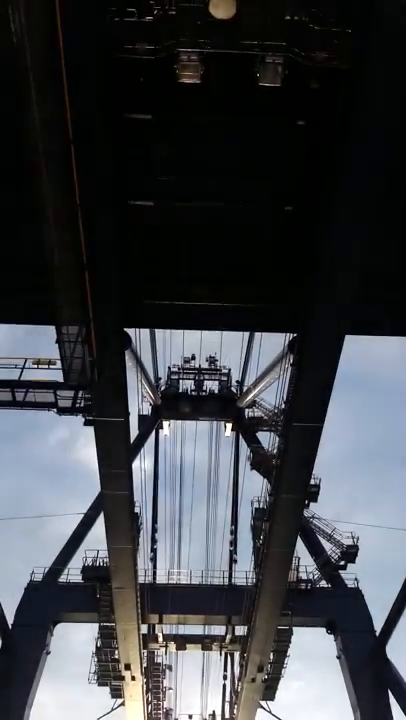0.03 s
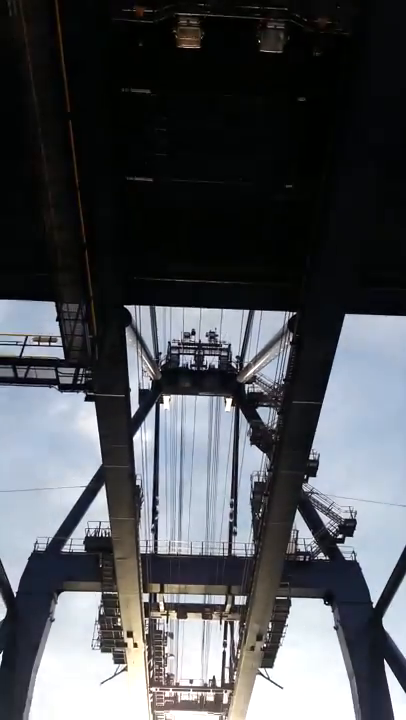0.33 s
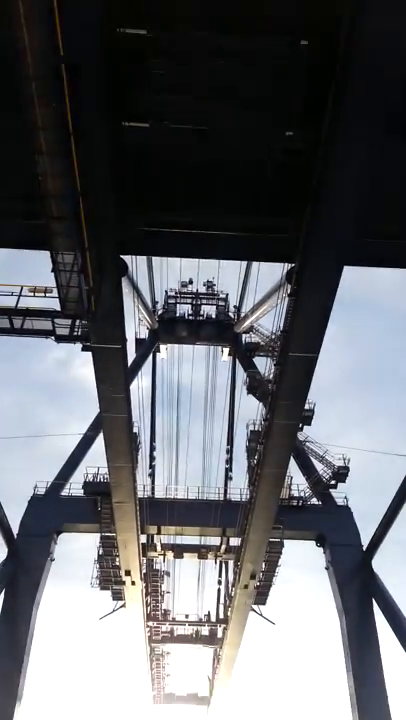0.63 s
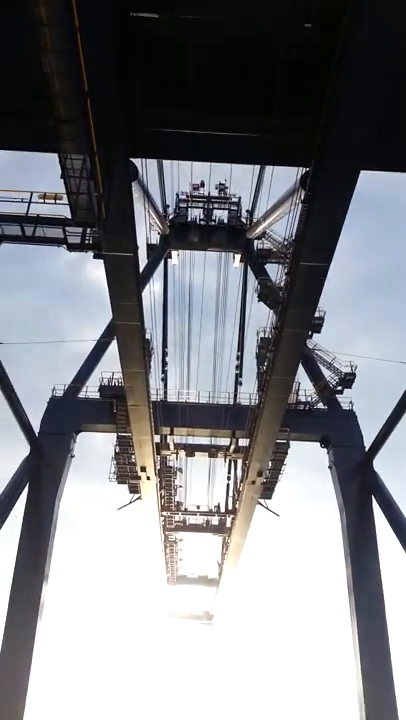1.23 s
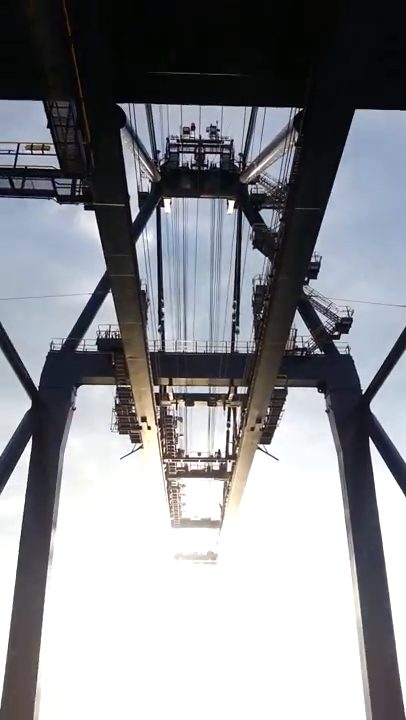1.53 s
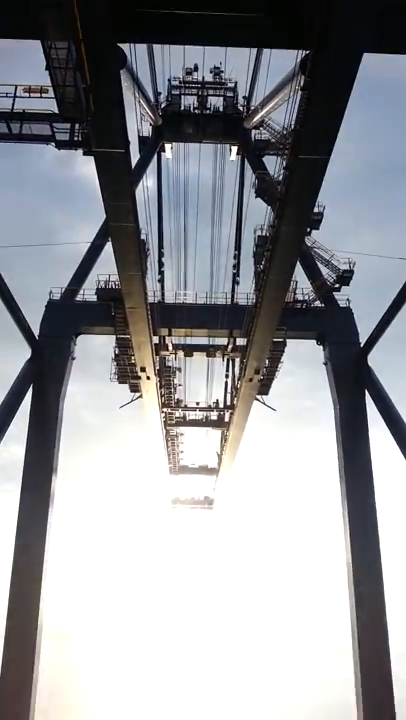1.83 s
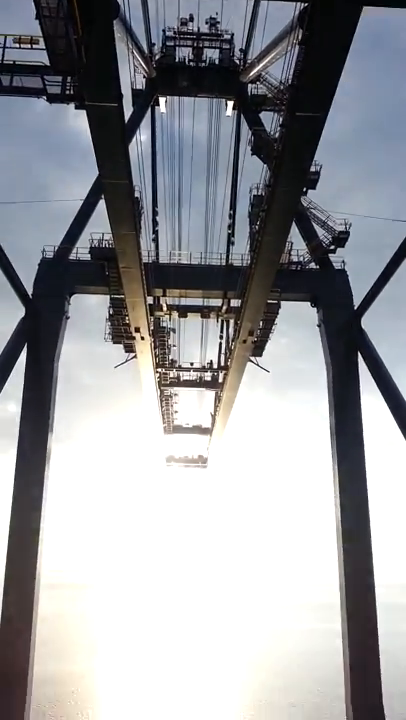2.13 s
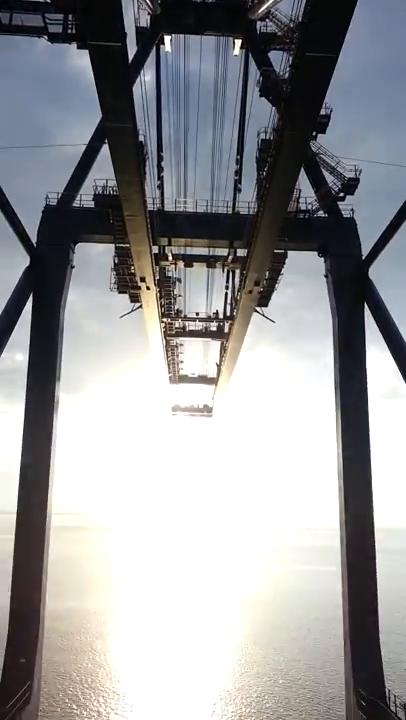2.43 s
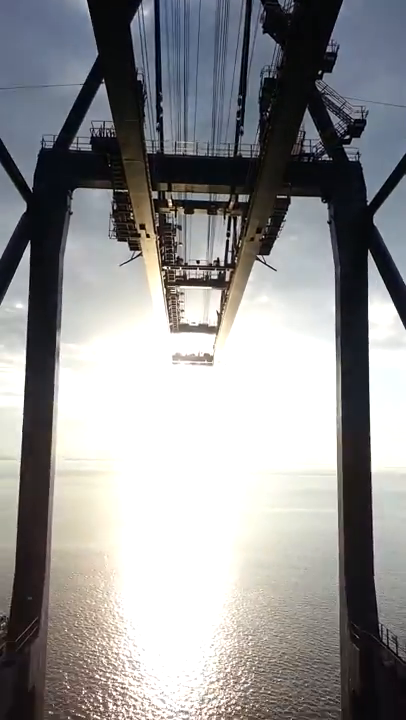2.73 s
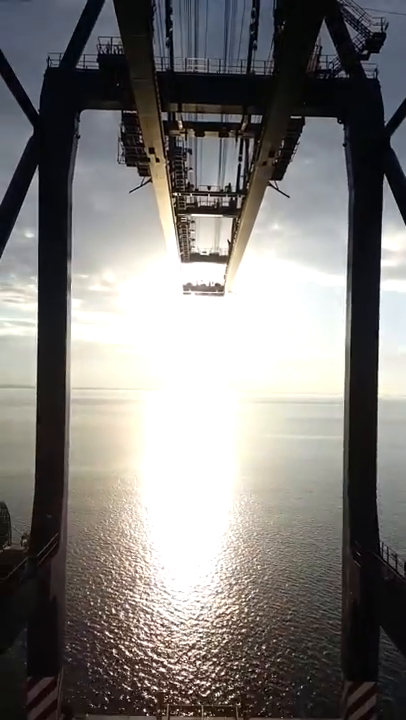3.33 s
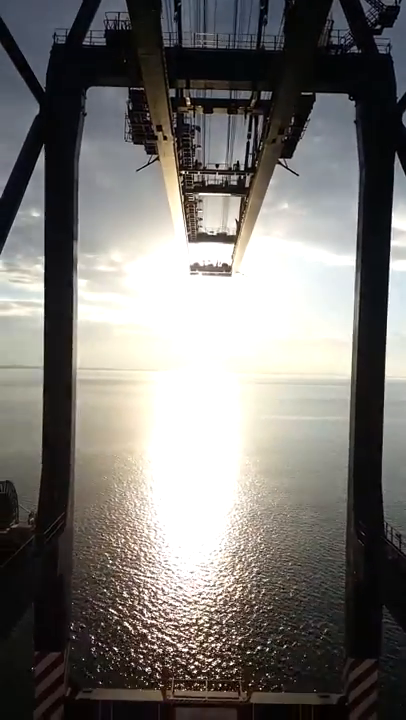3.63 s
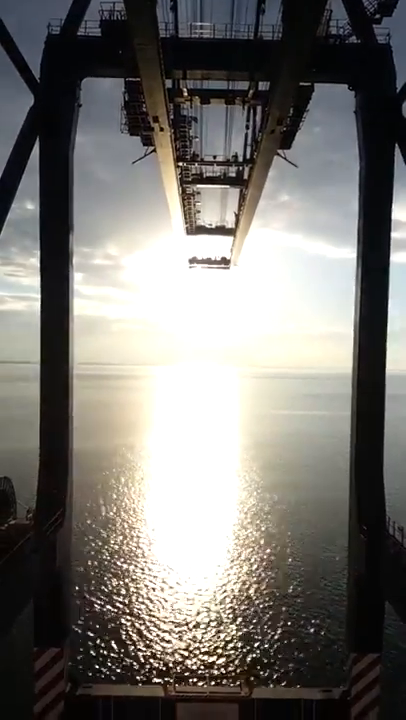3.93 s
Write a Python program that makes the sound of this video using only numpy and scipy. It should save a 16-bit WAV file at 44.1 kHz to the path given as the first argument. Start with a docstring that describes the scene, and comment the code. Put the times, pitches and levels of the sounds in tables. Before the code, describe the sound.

Heard from on board, a harbour crane trolley rumbles along with a hum, a high fluttering whine and quick rattling knocks. Late on it crosses a rail joint with a loud, lingering metallic boom and a smaller clank.

```python
"""The trolley of a container crane, heard on board as it rolls high above a harbour.
Its motor hums in harmonics of one fundamental, and the close tones of its inverter beat as they whine.
The wheels rumble and, for the first two seconds or so, clatter about eight times a second.
Late on they cross a rail joint: the impacts excite the modes of the steel girder,
which boom and slowly die away, and a lighter clank follows."""
import sys
import numpy as np
from scipy import signal
from scipy.io import wavfile

SR = 44100
rng = np.random.default_rng(int(sys.argv[2]) if len(sys.argv) > 2 else 0)


def to_wav(sig):
    """Store sig (one row per channel, or 1-D mono) as 16-bit WAV at the path in sys.argv[1].

    Samples outside -1..1 are clipped; the rate is SR.
    """
    pcm = np.clip(np.atleast_2d(sig), -1, 1) * 32767
    pcm = np.round(pcm).astype(np.int16)
    wavfile.write(sys.argv[1], SR, pcm.T)  # frames by channels


N = 176400

# Balance is left level minus right; lead is the phase by which the left ear is ahead.
# motor harmonics: order, relative level/dB, balance/dB, growth/(dB/s), lead/rad
MOTOR_HARMONICS = [(3, -45.5, -2, -1.0, 0.6), (5, -39.0, 0, 1.0, 2.8), (6, -44.0, 6, 2.5, -0.8),
                   (7, -52.0, 0, -0.5, -1.2), (9, -45.5, -4, -2.5, 1.1), (10, -52.0, -6, -2.5, -1.5),
                   (12, -55.5, 2, 1.0, 1.2), (13, -45.0, 3, 1.5, -0.5), (15, -52.5, 1, 2.0, 2.1),
                   (17, -50.0, 1, -3.0, 2.0), (21, -55.0, 6, -2.5, -1.2)]
# gear and drive tones: f/Hz, relative level/dB, balance/dB, growth/(dB/s), lead/rad
GEAR_TONES = [(1229, -45.0, 4, 2.5, 3.0), (1280, -42.5, 3, 0.0, 2.9), (1536, -53.0, 4, 2.5, 2.9),
              (1791, -48.0, 2, 1.0, 1.5), (1842, -45.0, -2, 0.5, 1.7), (2047, -52.5, -4, 1.0, -0.2),
              (2456, -50.5, 0, 0.5, 0.3), (3685, -55.5, 1, 1.0, -2.7), (4095, -54.0, -1, -1.5, -3.1),
              (4300, -52.0, -2, -2.0, 2.7), (4351, -54.5, -2, 0.5, 1.8), (4862, -59.0, 3, -1.5, -3.1),
              (5156, -60.5, -2, 0.5, 1.8)]
# course of the low hum: t/s, relative level/dB
HUM_LEVEL = [(0, 1), (.5, 1.5), (1.0, -1), (1.4, -7), (2.0, 0.5), (2.7, -6.5), (4.0, -5)]
# the inverter's two whines: t/s, relative level/dB, balance/dB
LOWER_WHINE = [(0, -37.5, 3), (0.1, -36.0, -12), (0.22, -30.0, 2), (0.33, -36.0, 5), (0.48, -32.5, -5),
               (0.6, -31.5, -8), (0.7, -28.0, -3), (0.86, -28.5, -1), (0.97, -31.5, 3), (1.12, -30.0, 1),
               (1.25, -29.5, -2), (1.38, -32.5, -14), (1.55, -32.0, 3), (1.88, -35.5, -14),
               (2.1, -32.0, -7), (2.3, -32.0, 0), (2.48, -35.0, -5), (2.66, -44.0, 1), (2.87, -35.5, 1),
               (3.15, -40.5, -14), (3.52, -31.5, -1), (3.8, -36.0, 3), (3.95, -36.0, 3)]
UPPER_WHINE = [(0, -44.0, 11), (0.2, -45.0, 1), (0.33, -37.0, -1), (0.48, -39.0, -1), (0.66, -34.0, -1),
               (0.85, -37.0, -12), (1.05, -41.5, -10), (1.2, -42.0, 10), (1.4, -40.5, 6), (1.8, -45.0, -2)]
# their direction, turning as the trolley moves: t/s, lead/rad
WHINE_LEAD = [(0, .3), (.35, -.6), (.6, .8), (.87, 1.0), (1.05, 2.5), (1.37, 2.4), (1.55, 1.2), (1.8, 1.6),
              (2.05, -1.4), (4, -1.1)]
# inverter side tones and overtones: f/Hz, level/dB, balance/dB, growth/(dB/s), lead/rad
INVERTER_TONES = [(3046, -51.5, 3, -6.0, 1.2), (3055, -49.5, 0, 1.5, -2.6), (3108, -48.5, -1, -2.0, 3.0),
                  (3138, -50.5, -4, 1.0, 2.0), (6117, -66.0, 3, -6.0, 2.2), (6141, -58.5, 0, 2.0, -1.2),
                  (6157, -59.5, 0, 2.5, -0.8), (9192, -67.0, 2, -2.0, 2.2), (9231, -62.5, -1, 0.0, -1.4)]
# course of the wheel rumble: t/s, level/dB
RUMBLE_LEVEL = [(0, -32.5), (.6, -32), (1.1, -31), (1.5, -33.5), (2.2, -35), (2.7, -36.5), (2.98, -37),
                (3.06, -33)]
# spectra of wheel rumble and of air and rail hiss: f/Hz, relative density/dB
RUMBLE_SPECTRUM = [(25, -28), (50, -37), (80, -12.5), (125, -5), (190, -0.5), (250, -1.5), (310, -2.5),
                   (400, -5.5), (520, -2), (800, -4.5), (1250, -4), (1700, -24.5), (3000, -32)]
HISS_SPECTRUM = [(500, -32), (1200, -7), (1700, 5.5), (2200, 1), (2650, 7.5), (3100, 8), (3900, 4.5),
                 (5200, -1.5), (6100, -8.5), (7900, -15), (9000, -32.5), (10200, -16), (12000, -51)]
# likeness of the two ears' signals, for rolling and for the girder: f/Hz, correlation before clipping
ROLL_LIKENESS = [(60, 0.35), (130, 0.95), (280, 0.89), (610, 0.65), (1320, 0.3), (2860, -0.67),
                 (6190, 0.27), (13400, -1.1)]
GIRDER_LIKENESS = [(60, 0.73), (150, 0.99), (360, 0.92), (900, 0.52), (2210, 0.64), (5440, -0.24),
                   (13400, 0.98)]
# side from which each noise band arrives: f/Hz, balance/dB
BAND_BALANCE = [(200, -1), (700, -1), (1000, 0), (1350, 7), (1750, 0), (2200, -0.5), (3300, 0),
                (4300, -3.5), (6000, 4), (9000, 1)]
# wheel knocks: t/s, clatter level/dB, rattle level/dB, ring level/dB
KNOCKS = [(0.004, -30.5, -30, -41), (0.124, -28, -32, -37), (0.247, -31, -30, -46),
          (0.366, -32.5, -30.5, -40), (0.489, -29, -31, -40), (0.62, -28, -33, -36), (0.734, -40, -38, -38),
          (0.854, -28, -34, -36), (0.936, -30, -48, -51), (0.965, -45, -46, -41), (1.048, -33.5, -36, -32),
          (1.163, -37, -41, -32.5), (1.285, -33.5, -37.5, -31.5), (1.413, -32, -38, -36),
          (1.534, -31.5, -41.5, -36), (1.665, -28.5, -33.5, -33), (1.798, -31, -41, -36),
          (1.947, -34, -47, -38), (2.08, -33.5, -50, -45), (2.203, -38.5, -42, -56),
          (2.333, -30.5, -39, -47)]
# spectra of a knock's two noises: f/Hz, relative density/dB
CLATTER_SPECTRUM = [(60, -38), (160, -9.5), (300, -9), (600, -6), (800, -3), (1030, 2.5), (1350, 2),
                    (1700, -21), (2600, -9.5), (3500, -18), (6000, -35)]
RATTLE_SPECTRUM = [(1200, -22), (2100, 10.5), (3000, 10.5), (4000, 6), (5300, -1), (6200, -46), (9000, -23)]
# spectra of the sounds at the rail joint: f/Hz, relative density/dB
BOOM_SPECTRUM = [(25, -48), (50, -46.5), (80, -23), (120, -13), (170, 1), (300, -1.5), (480, -3.5),
                 (680, -11), (1150, -9), (1900, -22), (2800, -20), (3800, -26.5), (5300, -21.5),
                 (6100, -30.5), (8200, -35.5), (9500, -55)]
CONTACT_SPECTRUM = [(300, -5), (600, -4), (850, 27), (1100, -11), (1700, -18), (5000, -28)]
CRASH_SPECTRUM = [(300, 4), (700, 12), (1300, 15), (2000, -3), (3000, -15), (4300, 1), (5200, 3),
                  (6200, -15), (8200, -20), (9300, -42)]
SWELL_SPECTRUM = [(70, -37), (150, -10), (240, 0), (320, 8), (400, 0), (500, -7), (750, -12), (2000, -48)]
CLANK_SPECTRUM = [(150, -28.5), (600, -2), (1000, -5), (1350, 12), (1900, -11.5), (2800, -6), (4500, -11),
                  (6200, -29), (9000, -56)]
# time the girder takes to decay by 60 dB: f/Hz, T60/s
GIRDER_T60 = [(60, 14), (150, 2.7), (300, 3.6), (600, 3.26), (1200, 3.17), (3000, 4.7), (8000, 2.9)]

MOTOR_HZ, LOWER_WHINE_HZ, UPPER_WHINE_HZ = 224.2, 3070, 3093.5
RING_HZ, RING_WIDTH_HZ = 3065, 200
FIRST_BLOW_S, SECOND_BLOW_S = 3.055, 3.112


def from_db(db):
    """Amplitude ratio: tenfold for every 20 dB."""
    return 10 ** (np.asarray(db) / 20)


def unit_rms(x):
    """Normalisation to unit mean power."""
    return x / np.sqrt(np.mean(x ** 2) + 1e-20)


def clock():
    """Uniform sampling: the time of each sample in seconds."""
    return np.arange(N) / SR


def in_time(rows):
    """Linear interpolation of (t/s, value) rows at every sample."""
    return np.interp(clock(), *np.transpose(rows))


def at_hz(rows, hz):
    """Interpolation of (f/Hz, value) rows on a logarithmic frequency axis."""
    frequencies, values = np.transpose(rows)
    return np.interp(np.log(hz), np.log(frequencies), values)


def pan(balance_db):
    """Level difference between the ears at constant total power."""
    gains = from_db(np.array([[1], [-1]]) * balance_db / 2)
    return gains / np.sqrt(np.mean(gains ** 2, axis=0))


def drift(rate_hz):
    """Slow random fluctuation: low-pass filtered noise of unit rms."""
    step, settling = 100, 1000
    pole = np.exp(-2 * np.pi * rate_hz * step / SR)
    white = rng.standard_normal(N // step + settling + 2)
    slow = signal.lfilter([1], [1, -2 * pole, pole ** 2], white)[settling:]
    return np.interp(np.arange(N) / step, np.arange(len(slow)), unit_rms(slow))


def tone(hz, lead, wander_hz, waver_db, scatter=0.42):
    """Interference: a wandering sine adds to reflections that shift differently at each ear."""
    phase = 2 * np.pi * np.cumsum(hz + wander_hz * drift(7.9)) / SR
    ears = []
    for angle in (phase, phase - lead):
        waver = from_db(waver_db * drift(2.8))
        reflections = drift(5.5) / 2 * np.sin(angle) + drift(1.53) * np.cos(angle)
        ears.append(waver * (np.sin(angle) + scatter * reflections))
    return np.sqrt(2) * np.array(ears)


def partials(rows, wander_hz, waver_db, unit_hz=1):
    """Superposition of tones, each growing or fading as the trolley travels."""
    travel_s = np.minimum(clock(), 2.8) - 1.5   # growth pivots about 1.5 s and ends at 2.8 s
    return sum(from_db(db + growth * travel_s) * pan(balance)
               * tone(multiple * unit_hz, lead, wander_hz, waver_db)
               for multiple, db, balance, growth, lead in rows)


def motor():
    """Periodic vibration: the motor gives a harmonic series, its gears and drive add further tones."""
    hum = tone(2 * MOTOR_HZ, lead=1, wander_hz=0.7, waver_db=1, scatter=0.31)
    hum_gain = from_db(-36.5 + in_time(HUM_LEVEL)) * pan(-19.5)
    whirr = partials(MOTOR_HARMONICS, wander_hz=0.7, waver_db=1.8, unit_hz=MOTOR_HZ)
    gears = partials(GEAR_TONES, wander_hz=0.9, waver_db=2.6)
    return hum_gain * hum + from_db(-1.5) * whirr + from_db(-1) * gears


def inverter():
    """Beating: two close whines and their side tones flutter at their difference frequencies."""
    def whine(hz, rows):
        rows = np.array(rows)
        gain = from_db(in_time(rows[:, [0, 1]])) * pan(in_time(rows[:, [0, 2]]))
        return gain * tone(hz, in_time(WHINE_LEAD), wander_hz=1.8, waver_db=0.6, scatter=0.25)
    fade_db = 3 * np.maximum(clock() - 1.5, 0)
    lower = from_db(0.5) * whine(LOWER_WHINE_HZ, LOWER_WHINE)
    upper = from_db(-0.5 - fade_db) * whine(UPPER_WHINE_HZ, UPPER_WHINE)
    side_tones = partials(INVERTER_TONES, wander_hz=1.13, waver_db=0.1)
    top_overtone = from_db(-71) * tone(hz=12297, lead=1, wander_hz=1.8, waver_db=2.6)
    return lower + upper + side_tones + top_overtone


def band_noise(spectrum, likeness, flicker_db, envelope=lambda hz: 1):
    """Incoherent addition: third-octave noise bands, each with its own flicker, sum in power."""
    edges = 22 * 2 ** (np.arange(29) / 3)
    white = rng.standard_normal((2, 2, N))   # adjacent bands draw on independent noise
    total, power = 0, 0
    for k, (low, high) in enumerate(zip(edges, edges[1:])):
        if high < spectrum[0][0] or low > spectrum[-1][0]:
            continue
        hz = np.sqrt(low * high)
        bandpass = signal.butter(3, [low, high], "band", fs=SR, output="sos")
        mid, side = signal.sosfilt(bandpass, white[k % 2])
        correlation = np.clip(at_hz(likeness, hz), -0.99, 0.99)
        ears = np.sqrt(1 + correlation) * mid + np.sqrt(1 - correlation) * np.array([side, -side])
        gain = from_db(at_hz(spectrum, hz))
        flicker = from_db(flicker_db * drift(11.5))
        total += ears * pan(at_hz(BAND_BALANCE, hz)) * gain * envelope(hz) * flicker
        power += 4 * gain ** 2 * (high - low) / SR
    return total / np.sqrt(power)


def rolling():
    """Broadband noise: the wheels rumble beneath the steady hiss of cooling air and rail."""
    rumble = band_noise(RUMBLE_SPECTRUM, ROLL_LIKENESS, flicker_db=1)
    hiss = band_noise(HISS_SPECTRUM, ROLL_LIKENESS, flicker_db=1.7)
    return from_db(in_time(RUMBLE_LEVEL)) * rumble + from_db(-36) * hiss


def blow(start_s, db, rise_s, hold_s, t60_s):
    """Damping: after a linear rise and a hold, the amplitude of an impact decays exponentially."""
    t = clock() - start_s
    decay_db = -60 * np.maximum(t - rise_s - hold_s, 0) / t60_s
    return from_db(db) * np.clip(t / rise_s, 0, 1) * from_db(decay_db)


def wheel_knocks():
    """Impact excitation: each knock makes the frame clatter and rattle and the steel wheels resonate."""
    clatter_gain, rattle_gain, ring_gain = 0, 0, 0
    for start_s, clatter_db, rattle_db, ring_db in KNOCKS:
        clatter_gain += blow(start_s, clatter_db, rise_s=0.005, hold_s=0.02, t60_s=0.17)
        rattle_gain += blow(start_s, rattle_db, rise_s=0.003, hold_s=0.016, t60_s=0.14)
        ring_gain += blow(start_s, ring_db, rise_s=0.005, hold_s=0.02, t60_s=0.17)
    clatter = band_noise(CLATTER_SPECTRUM, ROLL_LIKENESS, flicker_db=2)
    rattle = band_noise(RATTLE_SPECTRUM, ROLL_LIKENESS, flicker_db=3)
    ring_band = [RING_HZ - RING_WIDTH_HZ / 2, RING_HZ + RING_WIDTH_HZ / 2]
    resonance = signal.butter(2, ring_band, "band", fs=SR, output="sos")
    ring = unit_rms(signal.sosfilt(resonance, rng.standard_normal((2, N))))
    return clatter_gain * clatter + rattle_gain * rattle + ring_gain * ring


def rail_joint():
    """Modal overlap: two blows excite girder modes so dense that they merge into decaying noise."""
    def free_decay(hz):
        t60_s = at_hz(GIRDER_T60, hz)
        first = blow(FIRST_BLOW_S, db=-18, rise_s=0.028, hold_s=0.033, t60_s=t60_s)
        second = blow(SECOND_BLOW_S, db=-17, rise_s=0.019, hold_s=0.026, t60_s=t60_s)
        return np.hypot(first, second)   # their energies add

    def steel(spectrum, envelope=lambda hz: 1):
        return band_noise(spectrum, GIRDER_LIKENESS, flicker_db=1.5, envelope=envelope)
    boom = steel(BOOM_SPECTRUM, free_decay)
    # a hard contact, a crash of loose steel, the swell of the girder's low ring, then a lighter clank
    contact = steel(CONTACT_SPECTRUM) * blow(FIRST_BLOW_S, -23.5, rise_s=0.002, hold_s=0.008, t60_s=0.1)
    crash = steel(CRASH_SPECTRUM) * blow(SECOND_BLOW_S, -22.5, rise_s=0.025, hold_s=0.04, t60_s=0.6)
    swell = steel(SWELL_SPECTRUM) * blow(start_s=3.21, db=-19, rise_s=0.07, hold_s=0.11, t60_s=1.1)
    clank = steel(CLANK_SPECTRUM) * blow(start_s=3.673, db=-22, rise_s=0.005, hold_s=0.04, t60_s=0.4)
    # the rail joint's sound is low-pass filtered steeply, silent above about 9.8 kHz
    lowpass = signal.cheby2(12, 60, 9790, fs=SR, output="sos")
    return signal.sosfilt(lowpass, boom + contact + crash + swell + clank)


def scene():
    """Linear superposition: the pressures of all sources add at the trolley."""
    return motor() + inverter() + rolling() + wheel_knocks() + rail_joint()


def record(dry):
    """Low-pass filtering: everything above 14 kHz is attenuated by at least 70 dB."""
    return signal.sosfilt(signal.cheby2(12, 70, 14000, fs=SR, output="sos"), dry)


dry = scene()
out = record(dry)
to_wav(out)
```